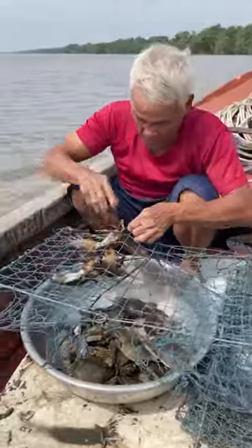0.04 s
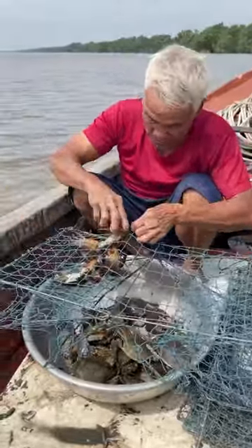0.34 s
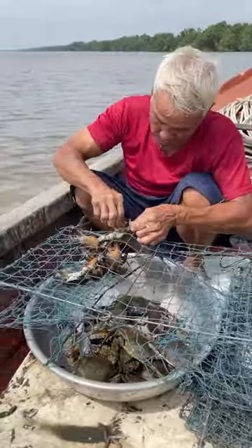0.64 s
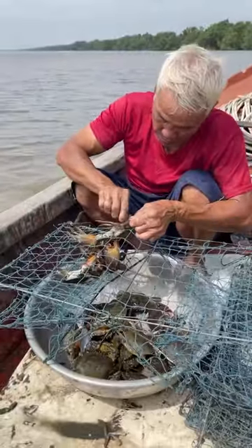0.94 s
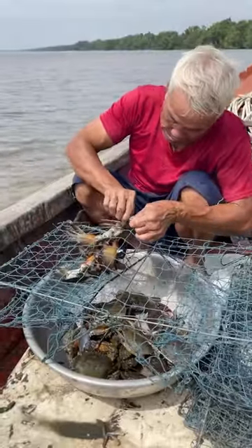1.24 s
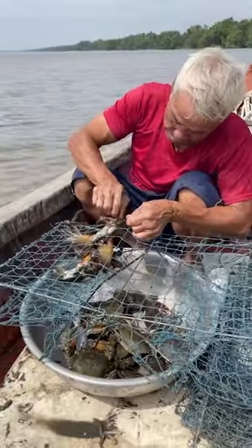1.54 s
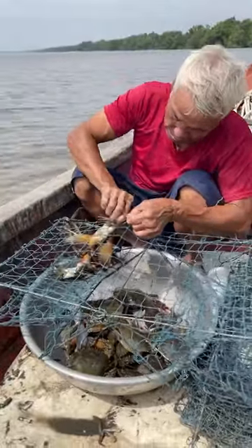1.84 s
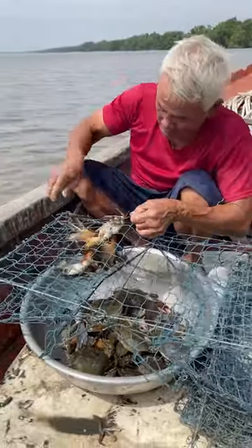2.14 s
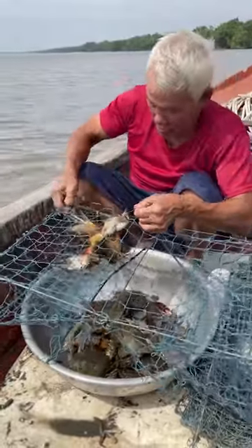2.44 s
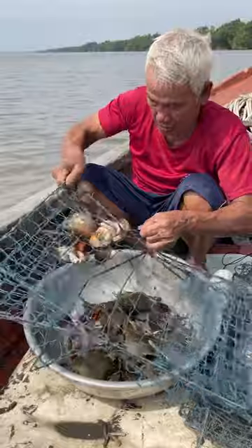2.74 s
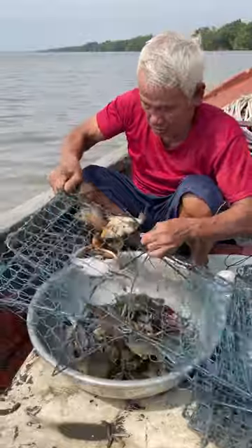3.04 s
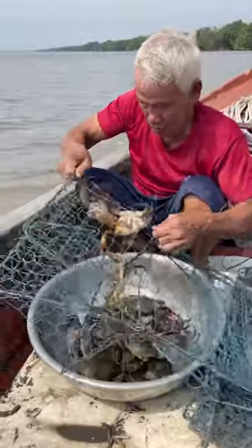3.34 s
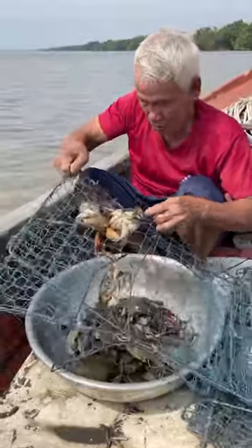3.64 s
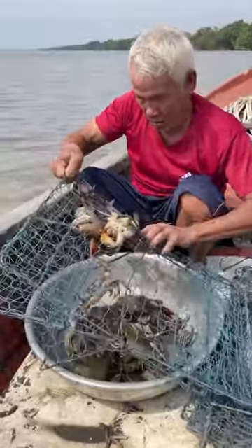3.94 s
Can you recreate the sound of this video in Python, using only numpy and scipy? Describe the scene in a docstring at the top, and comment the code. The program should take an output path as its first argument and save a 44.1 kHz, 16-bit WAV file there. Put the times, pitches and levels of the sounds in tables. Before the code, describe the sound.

A net rustles and clicks, then crabs tumble into a metal basin as wind buffets.

```python
"""On a small boat, close up, on a phone with two microphone ports. Water laps at the hull and wind buffets
the phone throughout. First a man picks at a net trap: twine rustles and snaps on crab shell. At about
2.5 s he shakes the net, and crabs tumble, clatter and scrape in a metal basin, whose ring their bodies
damp. The clatter thins out, and the strongest gust hits the microphone at the very end."""
import sys
import numpy as np
from scipy import signal
from scipy.fft import rfft, irfft
from scipy.io import wavfile
from scipy.ndimage import uniform_filter1d

SR = 44100
rng = np.random.default_rng(int(sys.argv[2]) if len(sys.argv) > 2 else 0)


def dump_mix(stems):
    """Bounce the given channels to the path in sys.argv[1] as a 16-bit WAV at rate SR."""
    frames = np.atleast_2d(stems).T  # one column per channel
    limited = np.clip(frames, -1, 1)  # hard clip at full scale
    pcm = np.round(limited * 32767).astype(np.int16)
    wavfile.write(sys.argv[1], SR, pcm)


N = 176400
TIME = np.arange(N) / SR

# Crabs landing in the basin. Each row: start and hold in seconds, then thud, clack and tick levels in dB.
CRAB_BLOWS = [(2.556, 0.019, -32, -29, -20), (2.625, 0.031, -31, -17.5, -25), (2.659, 0.006, -24, -12, -21),
              (2.665, 0.0095, -1, -11.5, -17), (2.7, 0.024, -6, -13.5, -16), (2.72, 0.013, -28, -28, -12.5),
              (2.776, 0.011, -39, -20, -19), (2.8, 0.0089, -11.5, -10.5, -2.5),
              (2.837, .003, -34, -17, -18), (2.849, 0.015, -10.5, -19.5, -13.5),
              (2.892, 0.03, -9.5, -7, -9.5), (2.937, 0.014, -35, -19, -25),
              (2.979, 0.0034, -11.5, -37, -40), (2.998, 0.01, -4, -9, 0.5), (3.039, 0.005, -9, -13, -17),
              (3.057, 0.0044, -8, -14.5, -21), (3.079, 0.0041, -15, -9, -5.5),
              (3.15, 0.0041, -10.5, -38, -32), (3.177, 0.0089, -28, -13, -9),
              (3.198, 0.037, -9.5, -12.5, -10.5), (3.268, 0.0055, -28, -15.5, -9),
              (3.29, 0.013, -19, -10, -7.5), (3.34, 0.0099, -17, -16.5, -9), (3.36, 0.015, -16, -3.5, -2.5),
              (3.430, 0.023, -23, -19, -30), (3.472, 0.0065, -22, -9, -14.5),
              (3.522, 0.022, -13.5, -15, -18), (3.617, 0.023, -23, -28, -30.5),
              (3.731, 0.031, -20, -28, -26.5), (3.878, 0.0092, -40, -29, -34),
              (3.905, 0.0031, -19.5, -14.5, -49), (3.949, 0.045, -33, -58, -33)]
# Legs scraping on the metal. Each row: time in seconds, level in dB.
SCRAPE_LEVEL = [(2.1, -85), (2.17, -37.5), (2.54, -35.5), (2.58, -21.5), (2.72, -24), (2.78, -27.5),
                (2.87, -18.5), (3.1, -31), (3.24, -14.5), (3.4, -31.5), (3.56, -25.5), (3.75, -27.5),
                (3.82, -50), (4, -29.5)]
# The basin's modes. Each row: frequency in Hz, relative level in dB, seconds to fall 60 dB.
BASIN_MODES = [(261, 4, 0.066), (294, -6, 0.26), (595, -0.5, .12), (685, -1.5, 0.18), (750, -0.5, 0.1),
               (1026, -4, 0.25), (1268, -10.5, 0.16), (1389, -1, 0.19), (1533, -4.5, 0.15),
               (1826, 2.5, 0.16), (2316, 0.5, 0.11), (2486, -2, 0.11), (2610, 0, .11), (2906, 0, 0.088),
               (3310, 6.5, 0.052)]
# How hard the net is rubbed. Each row: time in seconds, level in dB.
RUSTLE_LEVEL = [(0, -42), (.15, -46), (.3, -49.5), (.48, -43), (.69, -43), (.735, -33.5), (.772, -34),
                (.80, -44), (1.02, -43.5), (1.15, -42.5), (1.49, -45.5), (1.54, -29), (1.68, -46),
                (1.8, -39), (1.88, -36.5), (2.0, -40), (2.13, -43.5), (2.17, -29.5), (2.41, -31.5),
                (2.55, -33), (2.57, -18), (3.3, -17.5), (3.6, -29), (3.83, -38.5), (4, -30)]
# Twine and claws snapping. Each row: start in seconds, level in dB, dull knock in dB relative to that.
TWINE_SNAPS = [(0.136, -31.5, -1.5), (0.206, -27.5, -11.5), (0.247, -40, -7), (0.4641, -24, -32),
               (.597, -25, -19), (.621, -35, -6), (0.763, -36.5, 8), (0.942, -36, -9), (1.004, -36, -5),
               (1.049, -31, 3), (1.246, -32.5, -14), (1.515, -37, 1), (1.539, -25.5, -6.5),
               (1.631, -12, -17.5), (1.73, -40.5, 4.5), (1.800, -30.5, -1.5), (1.865, -35.5, 10.5),
               (1.899, -33.5, 4), (1.965, -25.5, -27), (2.008, -22, -5), (2.082, -35, -2),
               (2.1532, -5, -18), (2.353, -42, 1), (2.371, -23.5, -8), (2.406, -14.5, -9.5),
               (3.854, -26, -22)]
# Knocks on shell, basin or hull, and the trap's wire frame ringing as twine drags over it. Each row: start in
# seconds, pitch in Hz, level in dB, seconds to fall 60 dB.
PITCHED_KNOCKS = [(.755, 1484, -32, 0.32), (0.771, 400, -22.5, 0.031), (1.008, 5700, -26.5, 0.029),
                  (1.055, 333, -17, 0.062), (1.897, 760, -15, 0.027), (2.661, 1510, 5, 0.0091),
                  (2.668, 360, 15, 0.025), (2.703, 266, 1, 0.055), (2.912, 1825, -6, 0.091),
                  (3.038, 303, 1, 0.036), (3.081, 725, -6, 0.093), (3.369, 3200, 5, 0.029),
                  (3.379, 1426, -16.5, 0.25), (3.909, 642, -14, 0.062)]
# Net and water bumping the hull. Each row: start in seconds, hold in seconds, level in dB.
HULL_BUMPS = [(0.501, 0.086, -37), (0.761, 0.01, -32), (1.05, 0.0078, -39), (1.854, 0.047, -32.5)]
# Wind on the microphone. Each row: time in seconds, level in dB.
WIND_LEVEL = [(0, -31.5), (.21, -27.5), (.4, -33.5), (.9, -28), (1.2, -33), (1.5, -31), (1.62, -18.5),
              (1.73, -32), (1.9, -22), (2.06, -27), (2.16, -23.5), (2.3, -29), (2.38, -18), (2.46, -28.5),
              (2.9, -25.5), (3.72, -28.5), (3.78, -13.5), (3.86, -21.5), (3.93, -18.5), (3.98, -12.5),
              (4, -6)]

# The spectrum of each sound. Each row: frequency in Hz, relative level in dB.
THUD_SPECTRUM = [(50, -20.5), (165, -5.5), (250, 0), (370, -3), (500, -6.5), (750, -6), (1500, -19),
                 (6000, -68)]
CLACK_SPECTRUM = [(100, -25), (400, 1.5), (680, 3.5), (900, 2.5), (1200, -3.5), (1800, -4.5), (2150, -2),
                  (2800, 0), (3400, -5.5), (4500, -9.5), (8000, -15), (15000, -53)]
TICK_SPECTRUM = [(500, -30.5), (2500, 1.5), (4000, -2), (6300, 0), (8800, -0.5), (12000, 0), (16000, -12)]
NET_SPECTRUM = [(100, -11), (300, 5.5), (750, 5.5), (1100, -1.5), (1550, 0.5), (2100, -1), (3000, -2.5),
                (4500, -6.5), (6500, -6), (9000, -13), (13000, -6.5), (16000, -30)]
SNAP_SPECTRUM = [(200, -8), (1500, -9.5), (4000, -3), (6300, 0), (8800, 2), (12000, 3.5), (16000, -1)]
DULL_KNOCK_SPECTRUM = [(100, -8), (350, -2.5), (800, 0.5), (1500, 4), (2700, -0.5), (5000, -3),
                       (12000, -17)]
WATER_SPECTRUM = [(60, -2), (200, 8), (400, -8), (700, -4.5), (1200, -13), (3000, -26), (7000, -27),
                  (12000, -45), (15000, -58)]
WIND_SPECTRUM = [(15, -31), (30, -40), (48, -4.5), (65, -1), (90, -2.5), (125, -8.5), (200, -21),
                 (400, -33.5), (1500, -78.5)]

# Phase between the microphone ports. Each row: frequency in Hz, lead of the left port in radians.
PORT_LEAD = [(0, 0), (950, -1.2), (1380, 0.1), (1890, 0.0), (2580, 0.6), (3530, 0.1), (4130, 1.0),
             (5000, 2.8), (5770, 6.2), (6800, 6.5), (8350, 8.9), (10200, 9.7), (12600, 12.5), (15200, 12.7)]
# Balance between the ports. Each row: frequency in Hz, left minus right in dB.
PORT_TILT = [(60, 0), (380, -0.5), (700, -5.5), (1200, -6.5), (1900, 1), (2400, 0), (15000, 0.5)]
# The resonance of both ports. Each row: frequency in Hz, gain in dB.
PORT_RESONANCE = [(0, 0), (8000, 0), (9800, 1), (10500, 4), (11400, 6), (12200, 1), (13000, -9),
                  (14000, -14), (16000, -15)]


def crabs():
    """Bodies thud, shells clack, claws tick and legs scrape; shells and bodies ring the basin."""
    start, hold, thud_db, clack_db, tick_db = np.array(CRAB_BLOWS).T
    thuds = bursts(contacts(per_s=1500, spread_db=7.5), zip(start, hold, thud_db), release_s=0.0055)
    clacks = bursts(contacts(per_s=900, spread_db=6), zip(start, hold, clack_db), release_s=0.01)
    ticks = bursts(contacts(per_s=2800, spread_db=0), zip(start, hold, tick_db), release_s=0.0047)
    pressure = follow(SCRAPE_LEVEL)
    scrape = contacts(per_s=400, spread_db=3.5) * undb(2 * wander(per_s=50)) * pressure
    jostle = contacts(per_s=400, spread_db=-2) * pressure
    shells = colour(clacks + scrape, CLACK_SPECTRUM)
    bodies = colour(thuds + undb(-3.5) * jostle, THUD_SPECTRUM)
    claws = colour(ticks, TICK_SPECTRUM)
    direct = undb(-5.5) * shells + undb(-3) * bodies + claws
    reflections = undb(-4.5) * tail(shells, t60_s=0.05)
    return direct + reflections + basin(shells + undb(-9.5) * bodies)


def basin(push):
    """The damped metal rings briefly in its main modes, with a shimmer of many weak ones."""
    t = TIME[:SR // 2]
    modes = sum(undb(db - 60 * t / t60_s) * np.sin(2 * np.pi * (hz * t + rng.random()))
                for hz, db, t60_s in BASIN_MODES)
    return undb(-13.5) * through(push, modes) + undb(-10.5) * tail(push, t60_s=0.098)


def net():
    """Twine rubs over twine and shell in small uneven slips, with tiny pitched ticks."""
    rubbing = follow(RUSTLE_LEVEL)
    slips = unit_rms(contacts(per_s=2500, spread_db=-0.5) * undb(5 * wander(per_s=45))) * rubbing
    ticks = pings(per_s=220, spread_db=16) * rubbing
    rustle = undb(-2) * colour(slips, NET_SPECTRUM) + undb(-8) * ticks
    return undb(1) * rustle + undb(-4.5) * tail(rustle, t60_s=0.066)


def pings(per_s, spread_db, low_hz=1188, high_hz=12180, decay_cycles=4.5, candidates=2400):
    """Leg tips and knots tick at random, each at its own pitch; rms 1."""
    out = np.zeros(N + SR)
    t = TIME[:SR // 40]
    for when, pitch, size, chance in rng.random((candidates, 4)):
        if chance < per_s * N / SR / candidates:
            hz = low_hz * (high_hz / low_hz) ** pitch
            ring = np.sin(2 * np.pi * hz * t) * np.exp(-hz * t / decay_cycles)
            i = int(when * N)
            out[i:i + len(t)] += undb(spread_db * size ** 2) * np.sqrt(hz) * ring
    return unit_rms(out[:N])


def snaps(hold_s=0.0023):
    """Twine and claws snap: a sharp crack with a duller knock, scattered by the boat's sides."""
    grain = contacts(per_s=6500, spread_db=3.5)
    crack = bursts(grain, [(s, hold_s, db) for s, db, _ in TWINE_SNAPS], release_s=0.0031)
    knock = bursts(grain, [(s, hold_s, db + dull) for s, db, dull in TWINE_SNAPS], release_s=0.0098)
    direct = colour(crack, SNAP_SPECTRUM) + colour(knock, DULL_KNOCK_SPECTRUM)
    return direct + undb(-12) * tail(direct, t60_s=0.039)


def knocks():
    """Now and then a hard contact sounds one short resonance of shell, basin or hull, and twine dragged over
    the trap's wire frame sets it ringing."""
    out = np.zeros(N + SR)
    t = TIME[:SR // 4]
    for start, hz, db, t60_s in PITCHED_KNOCKS:
        i = int(start * SR)
        out[i:i + len(t)] += undb(db - 60 * t / t60_s) * np.sin(2 * np.pi * hz * t)
    return out[:N]


def water():
    """Behind the handling, ripples wash along the hull, with a few soft bumps."""
    ripples = rng.standard_normal(N) * undb(1.03 * wander(per_s=9.88))
    bumps = bursts(contacts(per_s=2500, spread_db=2.5), HULL_BUMPS, release_s=0.031)
    lapping = undb(-39) * colour(ripples, WATER_SPECTRUM) + colour(bumps, THUD_SPECTRUM)
    return lapping + undb(-4) * tail(lapping, t60_s=0.1)


def wind():
    """Eddies right on the microphone make a low buffeting, nearly the same at both ports."""
    shared = rng.standard_normal(N)
    per_port = undb(-18) * rng.standard_normal((2, N))
    eddies = colour(shared + per_port, WIND_SPECTRUM)
    running_rms = np.sqrt(uniform_filter1d(np.mean(eddies ** 2, axis=0), size=4000))
    return eddies / running_rms * follow(WIND_LEVEL)


def microphone_ports(sound):
    """The phone's two ports resonate alike, but each hears with its own phase and level."""
    hz = np.fft.rfftfreq(2 * N, 1 / SR)
    lead = np.interp(hz, *np.array(PORT_LEAD).T)
    tilt_db = np.interp(hz, *np.array(PORT_TILT).T)
    resonance_db = np.interp(hz, *np.array(PORT_RESONANCE).T)
    side = np.array([[0.5], [-0.5]])  # left, right
    response = np.exp(1j * side * lead) * undb(resonance_db + side * tilt_db)
    return irfft(rfft(sound, 2 * N) * response)[:, :N]


def contacts(per_s, spread_db):
    """Tiny impacts at random times, their sizes scattered by spread_db; rms 1."""
    size = undb(spread_db * np.clip(rng.standard_normal(N), -2, 2))
    sign = rng.choice([-1, 1], N)
    return unit_rms(size * sign * (rng.random(N) < per_s / SR))


def bursts(grain, rows, release_s, attack_s=0.00067):
    """Short clatters cut from a stream of contacts. Each row: start and hold in seconds, level in dB."""
    out = np.zeros(N)
    for start, hold, db in rows:
        i = int(start * SR)
        t = TIME[:min(SR // 4, N - i)]
        envelope = np.minimum(t / attack_s, 1) * np.exp(-np.maximum(t - hold, 0) / release_s)
        burst = envelope * grain[i:i + len(t)]
        energy_gain = np.sqrt(np.sum(envelope ** 2) / (np.sum(burst ** 2) + 1e-9))
        out[i:i + len(t)] += undb(db) * energy_gain * burst
    return out


def tail(x, t60_s):
    """A dense, dying ring, different at each port."""
    t = TIME[:SR // 2]
    return through(x, rng.standard_normal((2, len(t))) * undb(-60 * t / t60_s))


def colour(x, spectrum, size=8192):
    """Give a sound a spectrum, with minimum phase so that nothing rings ahead of a hit."""
    hz, db = np.array(spectrum).T
    log_hz = np.log(np.fft.rfftfreq(size, 1 / SR) + 1)
    gain = undb(np.interp(log_hz, np.log(hz), db))
    cepstrum = irfft(np.log(gain))
    cepstrum[1:size // 2] *= 2
    cepstrum[size // 2 + 1:] = 0
    return through(x, irfft(np.exp(rfft(cepstrum))))


def through(x, response):
    """Pass a sound through an impulse response scaled to unit energy."""
    response = np.atleast_2d(response)
    response = response / np.sqrt(np.sum(response ** 2, axis=-1, keepdims=True))
    return signal.fftconvolve(np.atleast_2d(x), response, axes=-1)[:, :N]


def wander(per_s):
    """A random drift with a spread near 1."""
    points = rng.standard_normal(2048)
    return np.interp(TIME * per_s, np.arange(len(points)), points)


def follow(curve):
    """Gain along a curve. Each row: time in seconds, level in dB."""
    return undb(np.interp(TIME, *np.array(curve).T))


def unit_rms(x):
    """Scale to rms 1."""
    return x / np.sqrt(np.mean(x ** 2))


def undb(db):
    """Decibels to gain."""
    return 10 ** (np.asarray(db) / 20)


def scene():
    """The work on deck, the water and the wind, as they reach the close phone."""
    return microphone_ports(net() + snaps() + knocks() + crabs() + water() + wind())


def record(dry, top_hz=15700):
    """The phone rounds off the loudest peaks and cuts the top."""
    limited = dry / (1 + dry ** 6) ** (1 / 6)
    lowpass = signal.ellip(10, 0.2, 70, top_hz, fs=SR, output="sos")
    return signal.sosfilt(lowpass, limited)


dry = scene()
out = record(dry)
dump_mix(out)
```